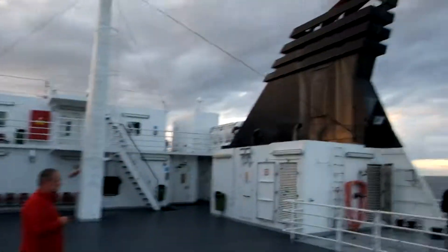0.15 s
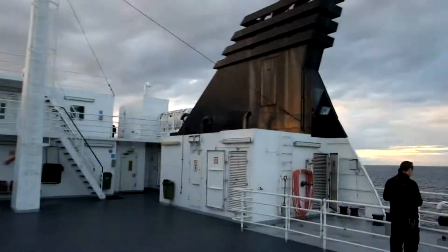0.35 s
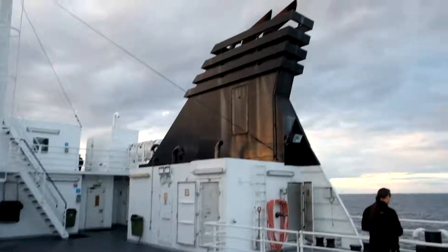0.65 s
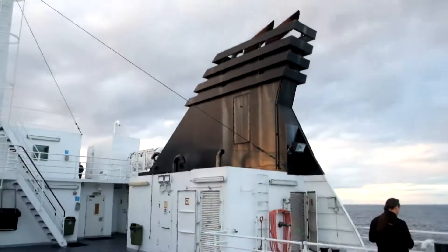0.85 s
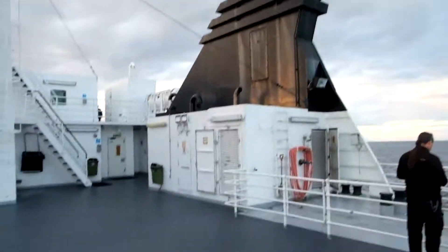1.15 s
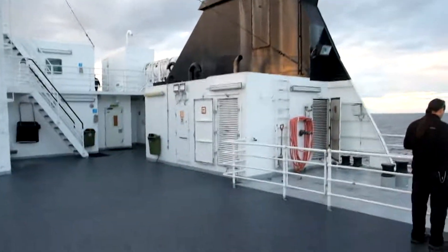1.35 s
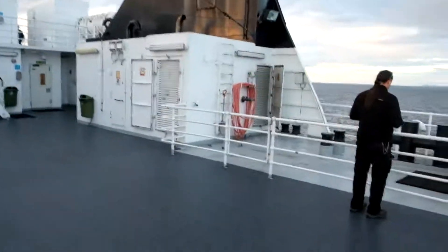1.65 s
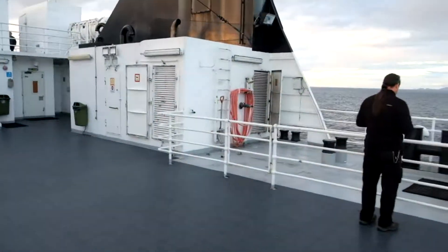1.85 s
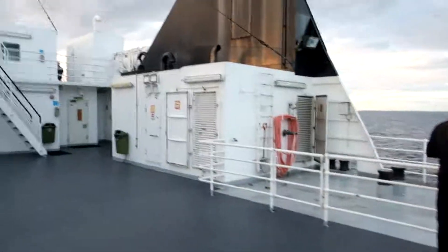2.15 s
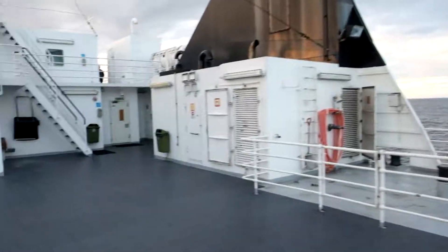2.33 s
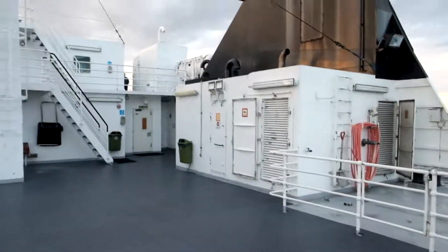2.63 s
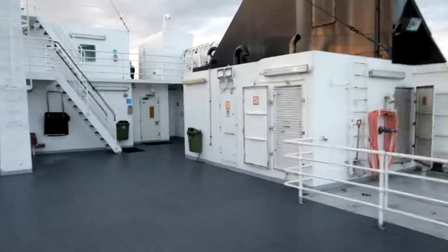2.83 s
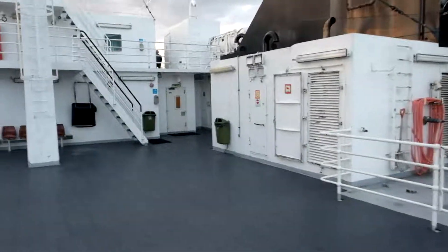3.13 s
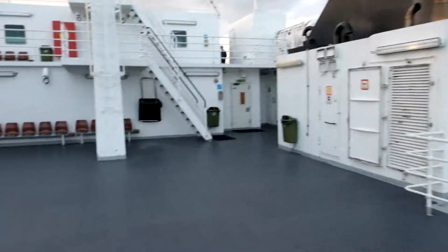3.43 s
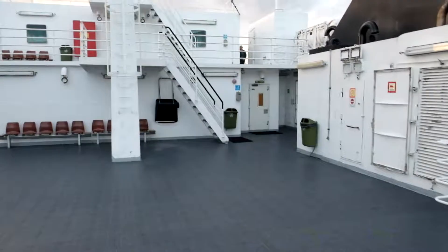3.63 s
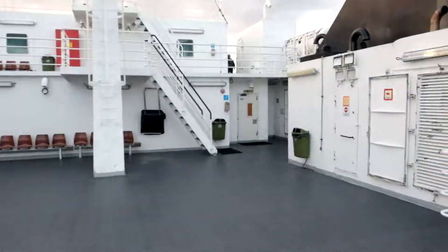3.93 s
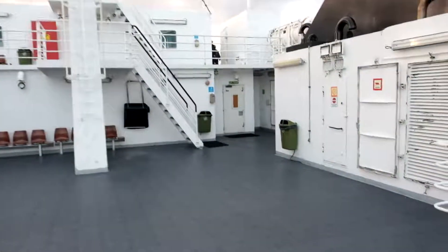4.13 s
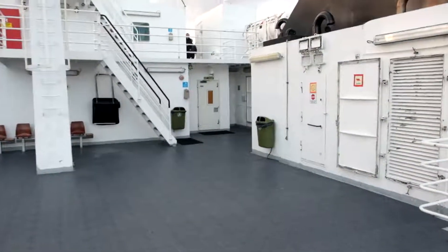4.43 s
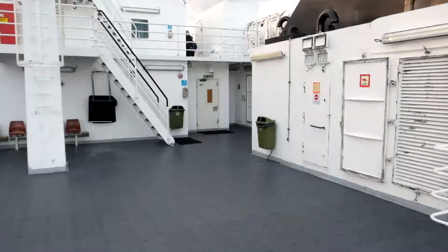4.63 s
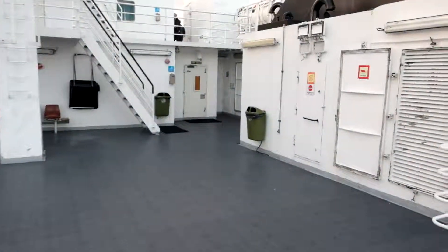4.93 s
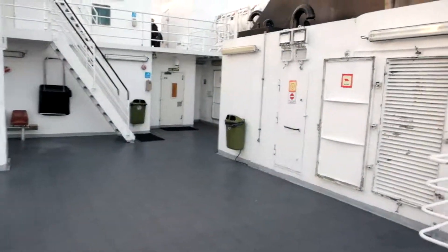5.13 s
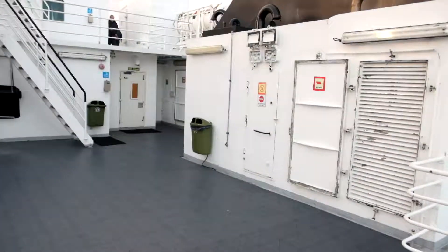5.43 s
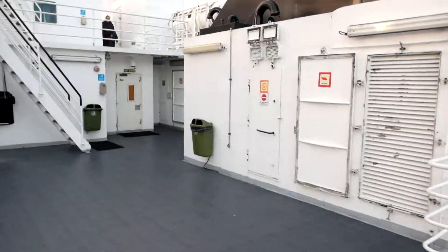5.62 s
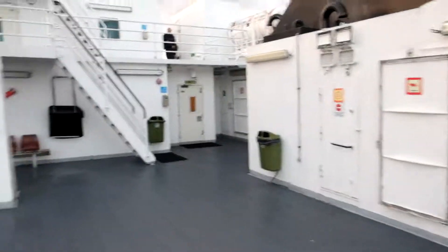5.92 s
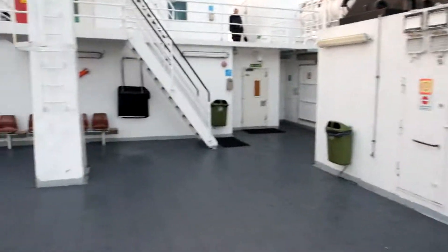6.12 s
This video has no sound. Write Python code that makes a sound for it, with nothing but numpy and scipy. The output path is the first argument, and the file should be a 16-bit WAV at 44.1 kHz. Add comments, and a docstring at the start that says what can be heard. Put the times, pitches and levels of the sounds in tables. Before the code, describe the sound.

Throughout, a ferry's diesel engines drone low and wide on the open deck, mostly around 80 to 300 Hz, throbbing and slowly beating as individual tones swell and fade. Over it lies a rough roar of exhaust and ventilation air, fuller in the first two seconds, then duller in the middle and hissier on top from about 3.5. Faint fan tones and a thin, wavering turbocharger whine near 4.6 kHz sit behind. Close on the left, dry ticks come at 0.05-0.25 seconds, small metal jingles near 0.3 and 0.7, and a brighter rattling cluster with a dry hiss at 1.25-1.45. A very faint whistle rises at 0.6-0.8. Wind thumps the handheld microphone at 0.6-0.9, densely on the right at 2.15-2.75, again around 3.2 and 3.8, and lightly near 5.45. Faint soft pips appear at 4.6-5.3; one tiny jingle at 6.0. The drone continues to the end.

```python
"""Open deck of a ferry at sea: diesel engines drone through the funnel, their shaft orders swelling and fading.
Around them air roars in louvres and ducts (shaped noise), fans and turbochargers whine (narrow noise, sines),
and a whistle and soft pips come and go. Wind slaps the two microphone ports of a hand-held camera as short
pulses; close by, its body ticks (noise bursts) and small metal parts jingle (decaying modes)."""
import sys
import numpy as np
from scipy import signal
from scipy.fft import rfft, irfft
from scipy.io import wavfile
from scipy.ndimage import uniform_filter1d

SR = 44100
rng = np.random.default_rng(int(sys.argv[2]) if len(sys.argv) > 2 else 0)


def dump(signal):
    """Clip the signal to [-1, 1] and save it as 16-bit WAV at the path in sys.argv[1]."""
    limited = np.clip(np.atleast_2d(signal).T, -1, 1)
    pcm = np.round(limited * 32767).astype(np.int16)
    wavfile.write(sys.argv[1], SR, pcm)


N = 276626
TIME = np.arange(N) / SR  # s


def amp(db):
    """Amplitude ratio of a level in dB."""
    return 10 ** (np.asarray(db) / 20)


def evened(x):
    """The signal scaled to rms 1."""
    return x / np.sqrt(np.mean(x ** 2) + 1e-20)


def read(points, hz):
    """A table of (Hz, value) read along a logarithmic frequency axis."""
    f, value = np.transpose(points)
    return np.interp(np.log(hz + 1), np.log(f + 1), value)


def curves(rows, t):
    """Each column after the first, drawn as straight lines over time."""
    s, *columns = np.transpose(rows)
    return [np.interp(t, s, c) for c in columns]


def drift(top_hz, count):
    """Slow chance: sines of random phase up to top_hz, rms 1, one row each."""
    t = np.arange(0, N + 256, 256) / SR
    hz = np.geomspace(top_hz / 20, top_hz, num=16)
    turns = hz[:, None] * t + rng.random((count, 16, 1))
    rows = np.sin(2 * np.pi * turns) / np.sqrt(hz[:, None])
    return np.array([np.interp(TIME, t, evened(r)) for r in rows.sum(1)])


def add(mix, s, sound):
    """Lay a sound into the mix from second s on."""
    part = mix[round(s * SR):][:len(sound)]
    part += sound[:len(part)]


def fuzzy(tones, same):
    """Unsteady tones: noise through narrow resonances; same is the correlation of the two ports."""
    hz = np.fft.rfftfreq(N, 1 / SR)
    a, b = rng.standard_normal((2, N))
    power = 0
    for f, width, db in tones:
        resonance = 1 / (1 + (2 * (hz - f) / width) ** 2) ** 2
        power = power + amp(db) ** 2 * 2 * SR / (np.pi * width) * resonance
    same = np.clip(same, -1, 1)
    ports = np.array([a, same * a + np.sqrt(1 - same ** 2) * b])
    return irfft(rfft(ports) * np.sqrt(power), N)


def turning(t):
    """Lifts in dB as camera and airflow turn: upper orders, mid roar, louvre rush, top hiss, treble pan."""
    # Each row: time in seconds, how far the camera faces the funnel (0-1).
    facing_rows = [(0, 0.95), (.55, 1), (1.2, 0.78), (2.2, 0.32), (3.2, 0.01), (4.3, 0.07), (5.7, 0),
                   (6.27, 0.22)]
    # Each row: time in seconds, surge of the airflow in dB.
    surge_rows = [(0, -0.5), (.5, 2), (1, 2.5), (1.2, 0), (1.35, 5.5), (1.55, 5), (1.75, 4.5), (2.0, 2.5),
                  (2.4, 2.1), (2.9, 2), (3.2, 0), (3.55, 1), (3.8, -1), (4.1, 1.5), (4.25, -2.5), (4.8, -2),
                  (4.95, 3), (5.15, 1.5), (5.3, -2), (5.7, 0.3), (6.27, 0.5)]
    # Each row: time in seconds, slow level of the top hiss in dB.
    top_rows = [(0, 1.5), (1.1, -1), (1.33, 3.5), (1.7, 0.5), (3.0, 0.5), (3.5, 6), (4.2, 6), (4.6, 6),
                (6.27, 6.5)]
    # Each row: time in seconds, slow level of the mid roar in dB.
    mid_rows = [(0, 1), (.3, -1.5), (.55, -2), (.75, 1), (1.1, -1.5), (1.4, 0), (2, 0.5), (2.8, 2.5),
                (3.4, 3), (4, 3), (4.4, 0.5), (4.8, 1.5), (5.05, -1.5), (5.4, 0), (6.27, 0)]
    # Values for upper orders, mid roar, louvre rush, treble left minus right: dB with the camera turned away.
    away_db = 0, -5, 2.5, -1
    # The same four: dB added when facing the funnel fully.
    funnel_db = 0.5, 8, -1, 4
    # The same four: share of the surge they follow.
    surge_share = 0.15, 0.44, 0.97, .1
    hiss_share = 0.72  # of the surge
    facing, = curves(facing_rows, t)
    surge_db, = curves(surge_rows, t)
    top_db, = curves(top_rows, t)
    lifts = [m + f * facing + s * surge_db for m, f, s in zip(away_db, funnel_db, surge_share)]
    orders, mid, rush, pan = lifts
    return orders, mid + curves(mid_rows, t)[0], rush, top_db + hiss_share * surge_db, pan


def whistle():
    """A brief faint whistle: one soft sine that steps up past its middle and dies away."""
    start_s, length_s, level_db = 0.6, 0.23, -49
    low_hz, rise_hz = 1017, 75
    u = np.clip((TIME - start_s) / length_s, 0, 1)
    hz = low_hz + rise_hz / (1 + np.exp((.55 - u) / 0.052))
    envelope = np.sqrt(2 * np.sin(np.pi * u).clip(0))
    return envelope * amp(level_db) * np.sin(2 * np.pi * np.cumsum(hz) / SR)


def pips():
    """Soft blips near the duct resonance: sines that swell and fade within a few hundredths of a second."""
    # Each row: middle in seconds, pitch in Hz, rms at the crest in dB.
    pip_rows = [(4.6, 850, -46), (4.75, 830, -47), (4.9, 826, -48), (4.975, 857, -44), (5.17, 770, -42),
                (5.25, 750, -44), (5.295, 754, -48)]
    spread_s = 0.021
    out = np.zeros(N)
    t = np.arange(-SR // 10, SR // 10) / SR
    for s, hz, db in pip_rows:
        swell = np.sqrt(2) * amp(db) * np.exp(-(t / spread_s) ** 2)
        add(out, s + t[0], swell * np.sin(2 * np.pi * hz * t))
    return out


def silencer_hoot():
    """The silencer duct hoots unevenly: resonant noise that follows the mid roar."""
    # Each row: pitch in Hz, width in Hz, rms in dB before the lift of the mid roar.
    hoot = [(825, 81, -49.5)]
    return fuzzy(hoot, 0.87) * amp(turning(TIME)[1])


def fans():
    """Blade tones of the ventilation fans: narrow noise, nearly alike at both ports."""
    # Each row: pitch in Hz, width in Hz, rms in dB.
    blade_tones = [(432, 20, -51), (570, 10, -57), (715, 8, -60), (1425, 20, -63), (1970, 16, -68),
                   (2140, 14, -69), (9280, 330, -80)]
    return fuzzy(blade_tones, 0.97)


def turbochargers():
    """Whine of the turbochargers: unsteady tones, hiss between them, and spells of one clear sine."""
    # Each row: pitch in Hz, width in Hz, level in dB before the lift.
    whine_tones = [(4467, 8, -72.5), (4551, 10, -76), (4682, 12, -75), (4760, 16, -72)]
    # The hiss between the tones, same columns.
    whine_hiss = [(4620, 220, -65.5)]
    # Each row: time in seconds, level of the whine in dB, used relative to its mean.
    whine_level = [(0.0, -74), (0.3, -55), (0.5, -68), (1.0, -60), (1.6, -58), (2.5, -55), (2.7, -62.5),
                   (3.27, -64), (3.54, -52), (4.38, -67), (5.0, -50.5), (5.3, -61), (5.6, -53), (6.27, -62)]
    # Each row: start in seconds, end in seconds, pitch in Hz, rms in dB before the waver.
    clear_spells = [(.7, .95, 4752, -70), (1.3, 2.55, 4467, -73), (1.55, 2.7, 4684, -70),
                    (1.95, 2.6, 4548, -68), (4.75, 5.2, 4755, -71)]
    lift_db, tone_share, hiss_share = 6, .35, .6  # shares: how far each follows the whine level
    lead_rad, waver_db = 1.0, 2  # the left port leads
    level_db, = curves(whine_level, TIME)
    out = np.zeros((2, N))
    for tones, share in (whine_tones, tone_share), (whine_hiss, hiss_share):
        out += fuzzy(tones, -0.17) * amp(lift_db + share * (level_db - level_db.mean()))
    for (start, end, hz, db), waver in zip(clear_spells, drift(12, count=len(clear_spells))):
        on = np.clip(np.minimum(TIME - start, end - TIME) / .08, 0, 1)
        phase = 2 * np.pi * hz * TIME + waver - lead_rad * np.arange(2)[:, None]
        out += on * np.sqrt(2) * amp(db + waver_db * waver) * np.sin(phase)
    return out


def roar():
    """Air rushing through louvres and ducts: random spectra, patchy, partly shared by the two ports."""
    # Each row: frequency in Hz, relative spectrum level in dB.
    roar_spectrum = [(12, -39), (20, -21), (55, -22.5), (98, -3.5), (274, -6), (352, -11), (506, -22.5),
                     (620, -22), (835, -23.5), (1300, -33.5), (1460, -31), (2280, -35), (4200, -38.5),
                     (4570, -35.5), (9420, -56.5), (15600, -73.5)]
    # Duct resonances. Each row: frequency in Hz, width in Hz, lift in dB.
    ducts = [(274.5, 31, 7), (850, 130, 1), (1090, 160, 3.5), (3450, 560, 2.5), (4660, 400, -9)]
    # Each row: frequency in Hz, likeness of the two ports (0-1).
    likeness = [(30, 0.23), (110, 0.7), (290, 0.96), (640, 0.91), (1400, 0.34), (3000, 0.2), (6000, 0.17),
                (8000, 0.2), (15000, 0.15)]
    # Each row: frequency in Hz, phase in radians by which the left port leads.
    port_lead = [(1300, 0), (2900, -2.0), (6200, -2.5), (8000, -6), (11600, -4.5), (15000, -11)]
    # Each row: frequency in Hz, left minus right in dB.
    balance = [(60, 2), (300, 2.5), (800, -1), (2400, 1.5), (4400, -2), (8000, 2), (15000, 2)]
    level_db = -30.5  # rms over both ports
    frames = N // 256 + 5
    hz = np.fft.rfftfreq(1024, 1 / SR)[:, None]
    a, b, c, d, patches, lumps = rng.standard_normal((frames, 513, 6)).T
    # the exhaust roar is coarse
    lumps = evened(uniform_filter1d(uniform_filter1d(lumps, size=3, axis=0), size=7, axis=1))
    patches = evened(uniform_filter1d(uniform_filter1d(patches, size=20, axis=0), size=12, axis=1))
    flicker = evened(uniform_filter1d(rng.standard_normal(frames), size=6))
    _, mid_db, rush_db, hiss_db, pan_db = turning(np.arange(frames) * 256 / SR)

    # exhaust roar, cut off sharply by the silencer
    mid = 1 / (1 + (hz / 920) ** 10) / (1 + (340 / (hz + 1)) ** 6)
    high = hz ** 2 / (hz ** 2 + 1020.0 ** 2)
    hiss = hz ** 4 / (hz ** 4 + 5600.0 ** 4)
    louvres = np.exp(-(np.log((hz + 1) / 1200) / 0.28) ** 2)  # their band grows as the exhaust roar fades
    db = read(roar_spectrum, hz) + sum(lift / (1 + (2 * (hz - f) / w) ** 2) for f, w, lift in ducts)
    db = db + (mid - 0.83 * louvres) * mid_db + (high - hiss) * rush_db + hiss * hiss_db
    db = db + high * flicker + 0.53 * patches + 2.1 * mid * lumps

    same = np.clip(read(likeness, hz), 0, 1)
    left = a + 1j * b
    right = same * left + np.sqrt(1 - same ** 2) * (c + 1j * d)
    right = right * np.exp(-1j * read(port_lead, hz))
    tilt = amp((read(balance, hz) + high * pan_db) / 2)
    spectra = np.array([left * tilt, right / tilt]) * amp(db)
    sound = signal.istft(spectra, nperseg=1024, noverlap=768)[1][:, :N]
    return amp(level_db) * evened(sound)


def scrape():
    """A brief dry hiss under the loudest jingles: band-passed noise, separate at each port."""
    middle_s, spread_s, level_db, band_hz = 1.33, .07, -63, (5500, 14000)  # level before the band filter
    sos = signal.butter(3, band_hz, "band", fs=SR, output="sos")
    hiss = signal.sosfilt(sos, rng.standard_normal((2, N)))
    swell = np.exp(-((TIME - middle_s) / spread_s) ** 2)
    return hiss * swell * amp(level_db + 2.0 * drift(60, count=1))


def ticks():
    """Dry ticks of the camera body, nearer the left port: band-passed noise bursts of about a millisecond."""
    # Each row: time in seconds, relative level in dB, pitch in Hz.
    tick_rows = [(.061, -55, 10500), (0.078, -45, 9400), (.126, -62, 7000), (.142, -62, 8000),
                 (.198, -55, 7500), (.221, -55, 11500), (1.255, -69, 11000), (1.284, -61, 10000),
                 (1.308, -59, 11300), (1.337, -58, 10000), (1.369, -63, 11500)]
    rise_s = .0008
    out = np.zeros(N)
    t = np.arange(300) / SR
    envelope = t / rise_s * np.exp(1 - t / rise_s)
    for s, db, hz in tick_rows:
        sos = signal.butter(2, [.7 * hz, 1.15 * hz], "band", fs=SR, output="sos")
        burst = evened(signal.sosfilt(sos, rng.standard_normal(300)))
        add(out, s - .001, amp(db) * burst * envelope)
    return out * amp([[2.5], [-5]])


def jingle():
    """Small metal parts nearer the left port: decaying modes, partly stilled by the next touch."""
    # Each row: time in seconds, relative level in dB, share of the low modes (0-1).
    touches = [(.268, -60, .95), (.282, -70, .2), (.31, -63, .97), (.667, -75, .3), (.694, -69, .3),
               (1.258, -76, .2), (1.284, -60, 0.25), (1.309, -57, 0.2), (1.337, -53, 0.85),
               (1.369, -57, 0.25), (1.405, -62, .9), (6.002, -70, .3)]
    # Ringing modes. Each row: pitch in Hz, relative level in dB, 60 dB decay time in seconds.
    modes = [(5300, -2, .2), (6842, 3, 0.16), (12050, -12, .12), (13030, 0, 0.2), (13550, -11, .15),
             (14450, -15, .1)]
    rise_s, damp_s = .0008, .004
    out = np.zeros(N)
    t = np.arange(SR // 4) / SR
    next_times = [row[0] for row in touches[1:]] + [N / SR]
    for (s, db, low), later in zip(touches, next_times):
        rattle = amp(1.5 * evened(uniform_filter1d(rng.standard_normal(len(t)), size=300)))
        ring = 0
        for hz, mode_db, t60 in modes:
            share = low if hz < 9000 else 1 - low
            ring = ring + share * amp(mode_db - 60 * t / t60) * np.sin(2 * np.pi * hz * t)
        stilled = .3 + .7 * np.exp(-np.maximum(t - later + s, 0) / damp_s)
        add(out, s, amp(db) * (1 - np.exp(-t / rise_s)) * rattle * stilled * ring)
    # the right port hears it four samples later
    return np.array([out, np.roll(out, shift=4)]) * amp([[4.5], [-8]])


def wind():
    """Eddies slap each port as short pressure pulses: a random patter louder in gusts, hard slaps, a rumble."""
    # Each row: middle in seconds, length in seconds, relative level in dB, share on the right port (0-1).
    gusts = [(.66, .1, -41, .05), (1.205, .09, -39, 0.97), (1.775, .03, -41, .9), (1.965, 0.02, -41, 1),
             (2.18, 0.04, -36, 1), (2.24, .03, -40, 1), (2.334, 0.03, -37, 1), (2.378, .03, -36, 1),
             (2.46, 0.04, -35, 0.97), (2.535, .03, -33, .96), (2.59, .05, -31, 0.96), (2.655, 0.03, -38, 1),
             (2.715, .03, -33, 1), (3.225, 0.04, -30, 0.85), (3.265, .03, -38, 1), (3.79, .04, -39, 1),
             (3.852, 0.03, -35, 0.98), (5.08, .15, -40, .5), (5.32, .07, -40.5, 0.1),
             (5.444, .04, -37, 0.7)]
    # Colour of the small eddies. Each row: frequency in Hz, gain in dB.
    buffet = [(20, -3), (100, -0.5), (300, 3), (700, -1.5), (1200, -10), (2000, -21), (3000, -28.5),
              (4000, -45.5), (8000, -90.5)]
    # The hardest single eddies. Each row: middle in seconds, relative level in dB,
    # share on the right port (0-1), pitch in Hz.
    slaps = [(0.0859, -17, 0, 500), (.6287, -10.5, 0.14, 450), (0.6478, -17, 0, 450), (.6643, -27, 0, 700),
             (.7645, -15, 0.5, 650), (.8927, -15, .4, 600), (1.1844, -18, 1, 600), (1.193, -26, 1, 1100),
             (1.2133, -32, 1, 750), (1.3044, -16, 0.8, 500), (1.55, -19, .5, 700), (1.7692, -16, 0.3, 696),
             (1.9543, -16.5, 0.9, 950), (1.9786, -19, 0.9, 1110), (2.157, -22, 1, 900),
             (2.1736, -11.5, 1, 650), (2.1878, -14.5, 1, 600), (2.2038, -20, 1, 700), (2.244, -17, 1, 450),
             (2.2914, -16, 0.9, 500), (2.3385, -9, 1, 430), (2.3818, -15.5, 1, 940), (2.4577, -8.5, 1, 450),
             (2.4675, -15, 1, 430), (2.4872, -11, 0.9, 650), (2.5007, -15, 1, 1000), (2.525, -13.5, 1, 900),
             (2.5314, -21, 1, 850), (2.5396, -11, 1, 810), (2.5519, -13, 1, 850), (2.565, -16, 1, 750),
             (2.5832, -13, 1, 800), (2.5995, -10, 1, 550), (2.6083, -17, 1, 900), (2.6521, -16, 1, 796),
             (2.6633, -11, 1, 453), (2.6855, -24, 0.9, 750), (2.6984, -14, 0.9, 645), (2.7087, -11, 1, 790),
             (2.7182, -9.5, 1, 850), (2.734, -15, 1, 1000), (3.1675, -11.5, 1, 540), (3.2008, -16, 1, 1110),
             (3.2153, -10.5, 1, 750), (3.2283, -24, 1, 850), (3.2385, -16, 1, 950), (3.2517, -18, 1, 750),
             (3.2736, -17, 1, 700), (3.7506, -17, .5, 600), (3.7951, -16, 0.8, 760), (3.843, -24, 1, 600),
             (3.8618, -28, 1, 654), (3.8904, -13.5, 1, 554), (5.4399, -19, 0, 650), (5.4595, -14.5, 1, 905)]
    # Slow pressure swings at each port. Each row: pitch in Hz, width in Hz, rms in dB.
    rumble = [(35, 27, -47)]
    slap_cycles = 0.33  # a slap builds and dies within about this many cycles
    eddies_per_s = 500

    power = amp(-55.5 + 3.3 * drift(9.5, count=2)) ** 2
    for s, length, db, right in gusts:
        share = np.clip([[1 - right], [right]], .01, 1)
        power = power + share * amp(db) ** 2 * np.exp(-((TIME - s) / (.5 * length)) ** 2)
    pulses = 0.064 + (rng.random((2, N)) < eddies_per_s / SR)
    small = evened(rng.uniform(-1.2, 1, (2, N)) * pulses) * np.sqrt(power) * amp(21.0)
    colour = amp(read(buffet, np.fft.rfftfreq(N, 1 / SR)))

    hard = np.zeros((2, N))
    u = np.arange(-400, 400) / SR
    for s, db, right, hz in slaps:
        envelope = np.exp(-(abs(u) * hz / slap_cycles) ** 1.5)
        slap = amp(db) * envelope * np.cos(2 * np.pi * hz * u + 0.74)
        for port, share in zip(hard, np.clip([1 - right, right], .05, 1)):
            add(port, s + u[0], share * slap)
    return uniform_filter1d(hard, size=7) + irfft(rfft(small) * colour, N) + fuzzy(rumble, 0)


def swells(t):
    """Gain over time, rms 1, of the orders that stand out: broad crests, narrow dips."""
    # Swell of one shaft order each. Each row: time in seconds, relative level in dB.
    order_6 = [(0.0, -47), (0.28, -39), (0.4, -52), (2.46, -33), (3.89, -35), (4.14, -46), (5.38, -31),
               (6.04, -40), (6.27, -36)]
    order_8 = [(0.0, -41), (0.98, -24), (1.31, -27), (1.57, -41), (1.75, -31), (2.09, -28), (2.64, -39),
               (3.0, -28), (3.81, -34), (3.95, -39), (4.19, -25), (4.5, -22), (4.73, -25), (5.05, -33),
               (5.38, -27), (5.64, -33), (6.09, -26), (6.27, -28)]
    order_10 = [(0.0, -34.5), (2.55, -41), (2.97, -34), (3.27, -45), (5.08, -37), (5.32, -50),
                (5.73, -35.5), (5.88, -45.5), (6.27, -45.5)]
    order_11 = [(0.0, -42.5), (0.45, -33), (1.33, -35), (3.4, -30.5), (3.47, -44), (3.95, -29.5),
                (4.31, -42), (5.08, -31), (5.2, -35), (5.94, -45.5), (6.2, -60.5), (6.27, -39.5)]
    order_13 = [(0.0, -34), (0.14, -26), (0.63, -28), (1.2, -40), (1.43, -29), (1.7, -30), (2.04, -40),
                (2.27, -26), (2.65, -37), (2.85, -25), (3.16, -35), (3.6, -33), (3.8, -26), (4.1, -27),
                (4.42, -36), (4.98, -30), (5.31, -44), (5.55, -32), (5.81, -42), (6.27, -36)]
    order_14 = [(0.0, -35), (0.91, -40), (1.27, -34), (1.61, -43), (2.01, -38), (4.14, -38), (4.72, -44),
                (5.12, -36), (6.27, -42)]
    order_16 = [(0.0, -46.5), (0.59, -29.5), (0.99, -35), (3.49, -45), (3.6, -33.5), (4.17, -52),
                (5.39, -49.5), (5.55, -60.5), (6.27, -48.5)]
    order_17 = [(0.0, -40), (0.17, -34), (1.57, -44), (1.8, -35), (2.2, -43), (3.39, -46), (3.65, -36),
                (4.77, -46), (5.06, -31), (5.27, -44), (6.16, -35), (6.27, -41)]
    order_21 = [(0.0, -42), (0.59, -32), (0.7, -38), (3.0, -41), (3.1, -47), (3.44, -36), (3.93, -45),
                (4.26, -36), (4.64, -44), (5.71, -37), (6.27, -42)]
    order_22 = [(0.0, -42), (0.49, -35), (1.01, -44), (1.89, -38), (2.25, -46), (2.48, -38), (3.18, -44),
                (3.34, -34), (3.51, -42), (6.27, -43)]
    # Orders 3, 5 and 7 beat evenly. Each row: period in seconds, a moment in step in seconds, depth (0-1).
    beats = [(2, 1.8, 0.7), (2.53, 1.87, 0.4), (0.93, 1.85, 1)]
    shapes = {6: order_6, 8: order_8, 10: order_10, 11: order_11, 13: order_13,
              14: order_14, 16: order_16, 17: order_17, 21: order_21, 22: order_22}
    gains = {k: curves([(s, amp(db)) for s, db in rows], t)[0] for k, rows in shapes.items()}
    for k, (period, s, depth) in zip((3, 5, 7), beats):
        gains[k] = abs(1 + depth * np.exp(2j * np.pi * (t - s) / period))
    return {k: evened(g) for k, g in gains.items()}


def engines():
    """Shaft orders: the quieter low ones sum engines of unequal, wandering speed and beat;
    the ones that stand out, and the high strands, each follow one engine."""
    # Each row: multiple of the shaft rate, level in dB relative to top_db.
    order_levels = [(1, -28.5), (2, -32.5), (3, -11), (4, -22.5), (5, -12.5), (6, -6.5), (7, -12), (8, 1),
                    (9, -10.5), (10, -9.5), (11, -6.5), (12, -13), (13, -1), (14, -9), (15, -16.5),
                    (16, -10.5), (17, -9), (18, -14), (19, -11), (20, -14.5), (21, -8), (22, -12),
                    (23, -33), (24, -28.5)]
    # High exhaust orders under the silencer edge. Each row: frequency in Hz, level in dB before the spread.
    strand_levels = [(340, -59), (450, -54.5), (600, -60.5), (850, -60), (920, -67)]
    # Order that stands out: the engine that leads it (0 slowest, 2 fastest; else the middle one).
    leading_engine = {6: 0, 11: 0, 16: 0, 13: 2, 21: 2}
    shaft_hz, count, top_db = 13.67, 3, -29.5
    speed_spread, speed_wander = .003, .0015  # shares of the shaft rate
    slip_rad, strand_smear_rad, strand_spread_db = 1.0, 2.2, 2

    offset = speed_spread * np.linspace(-1, 1, num=count)[:, None]
    speed = shaft_hz * (1 + offset + speed_wander * drift(1.5, count=count))
    turns = np.cumsum(speed, axis=1) / SR + rng.random((count, 1))
    standing_out = swells(TIME)
    unrest_db = 0.99 * drift(8.3, count=4)
    slip = slip_rad * drift(1.5, count=5)
    facing_db, mid_db = turning(TIME)[:2]
    lag = np.array([[.08], [-.08]])  # radians: the funnel sits a little to one side
    out = np.zeros((2, N))
    for k, (_, db) in enumerate(order_levels, start=1):
        phase = 1.534 * rng.standard_normal((count, 1))  # loosely aligned orders throb once a turn
        if k in standing_out:
            engine = leading_engine.get(k, 1)
            tone = np.sin(2 * np.pi * k * turns[engine] + phase[1] + slip[k % 5] - lag)
            out += amp(top_db + db + unrest_db[k % 4]) * standing_out[k] * np.sqrt(2) * tone
        else:
            together = np.exp(1j * (2 * np.pi * k * turns + phase)).sum(0) * np.sqrt(2 / count)
            out += amp(top_db + db + facing_db * (k > 13)) * (together * np.exp(-1j * lag)).imag

    high = np.arange(len(order_levels) + 1, 68)
    spread_db = strand_spread_db * rng.standard_normal(len(high))
    sizes = np.sqrt(2) * amp(read(strand_levels, high * shaft_hz) + spread_db)
    phases = 2 * np.pi * rng.random(len(high))
    waver = amp(3.4 * drift(14, count=8))
    smear = strand_smear_rad * drift(8, count=7)
    strands = np.zeros(N)
    for k, size, phase in zip(high, sizes, phases):
        strands += size * waver[k % 8] * np.sin(2 * np.pi * k * turns[k % count] + phase + smear[k % 7])
    return (out + strands * amp(mid_db)) * amp([[1.0], [-1.1]])


def scene():
    """Everything as it reaches the two ports."""
    air = whistle() + pips() + silencer_hoot() + fans() + turbochargers() + roar()
    close = scrape() + ticks() + jingle() + wind()
    return air + close + engines()


def record(dry):
    """The band limit of the recorder: a steep low-pass."""
    edge_hz = 15700
    taps = signal.firwin(511, edge_hz, window=("kaiser", 9), fs=SR)
    padded = np.pad(dry, ((0, 0), (255, 255)), "reflect", reflect_type="odd")
    return signal.oaconvolve(padded, taps[None], "valid")


dry = scene()
out = record(dry)
dump(out)
```